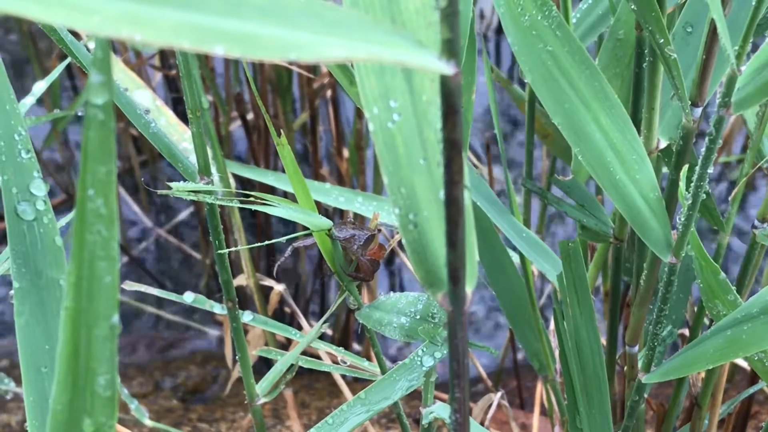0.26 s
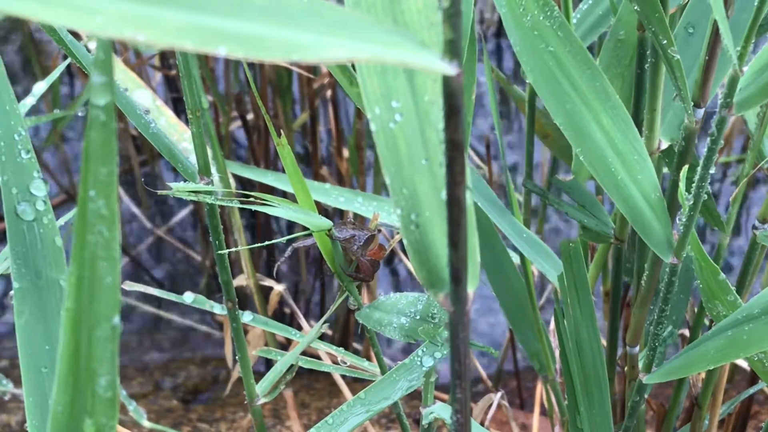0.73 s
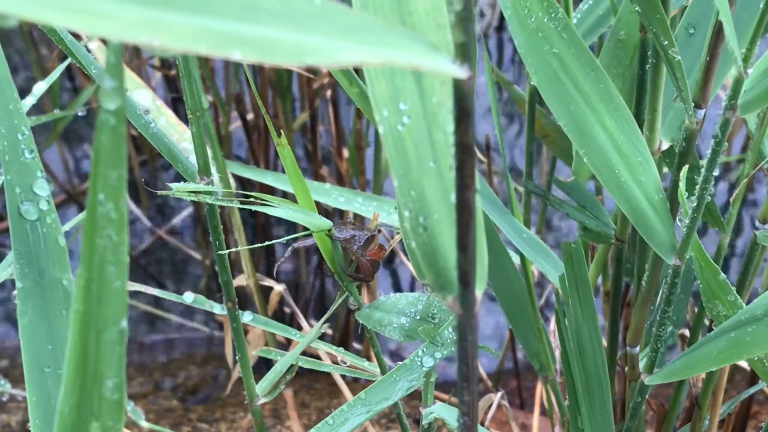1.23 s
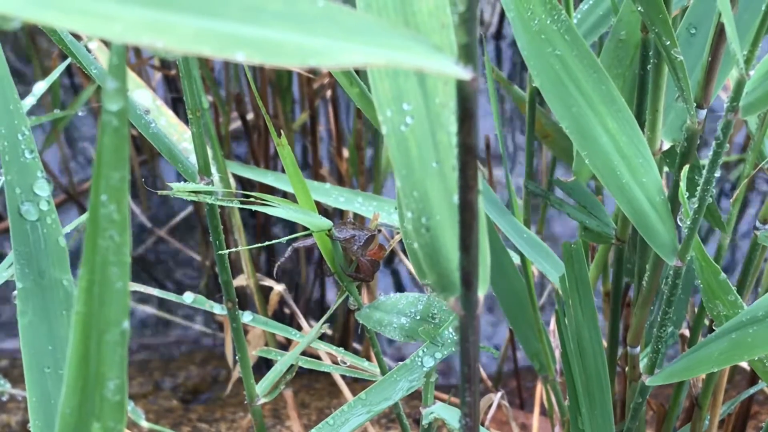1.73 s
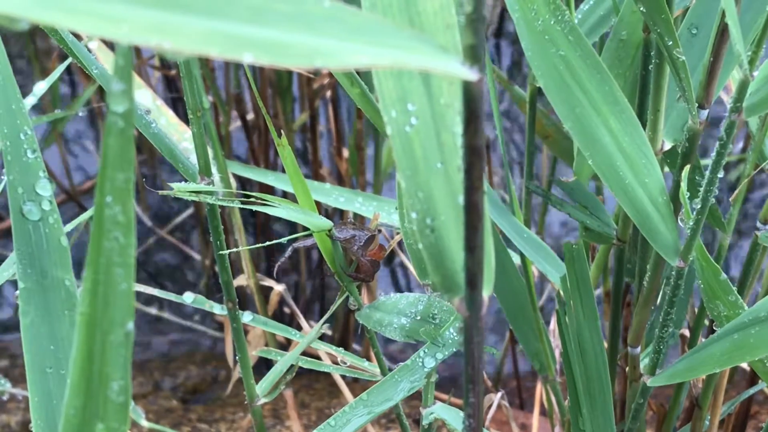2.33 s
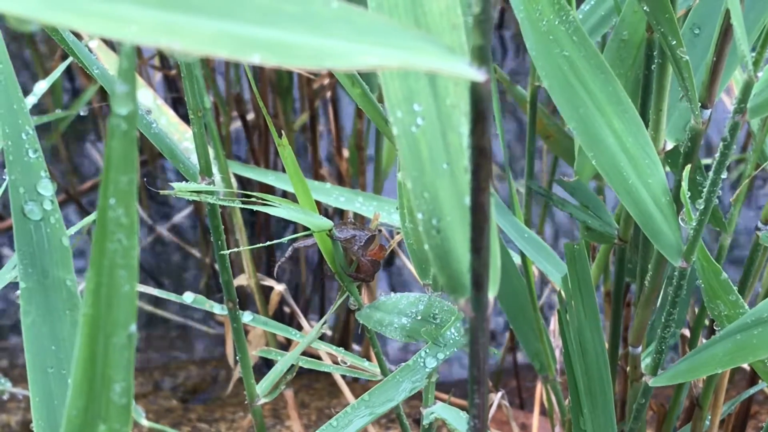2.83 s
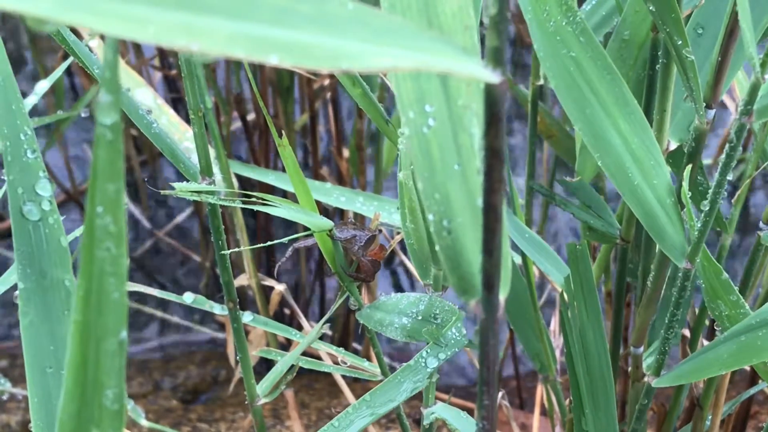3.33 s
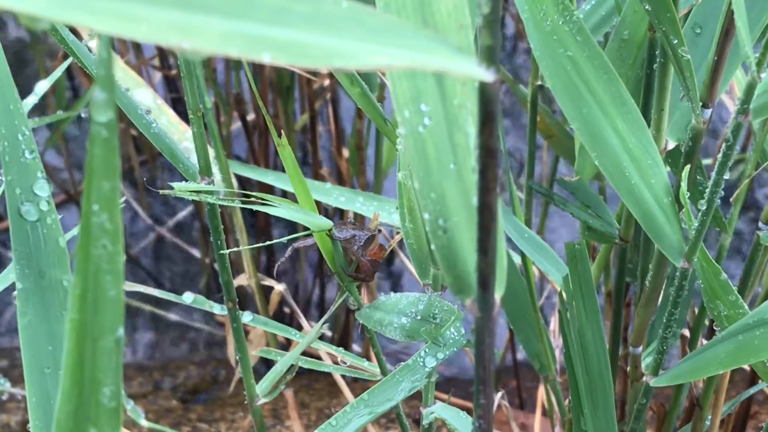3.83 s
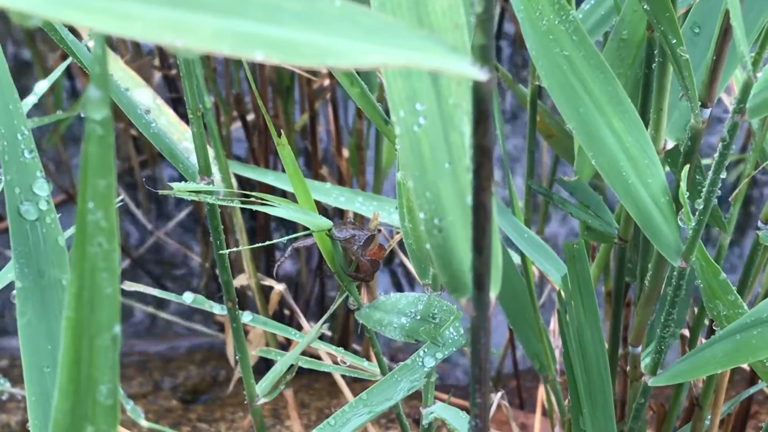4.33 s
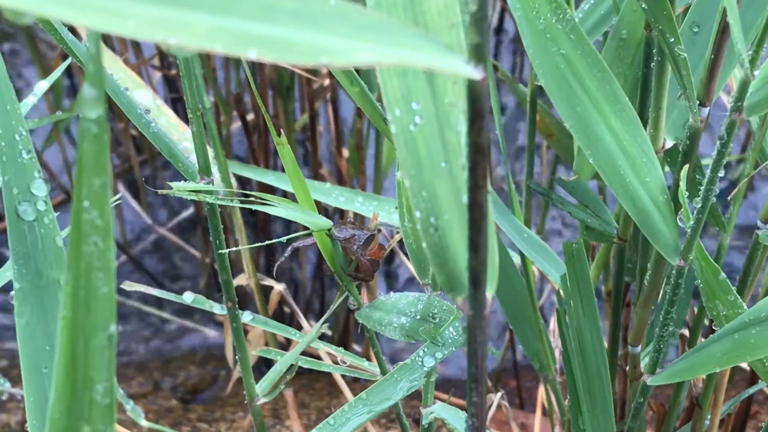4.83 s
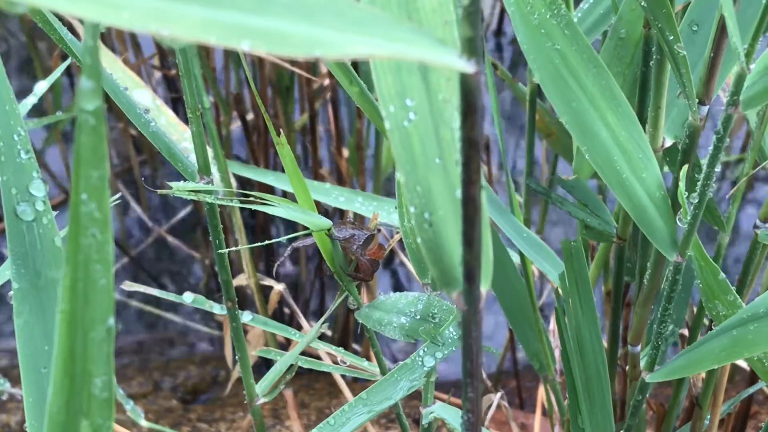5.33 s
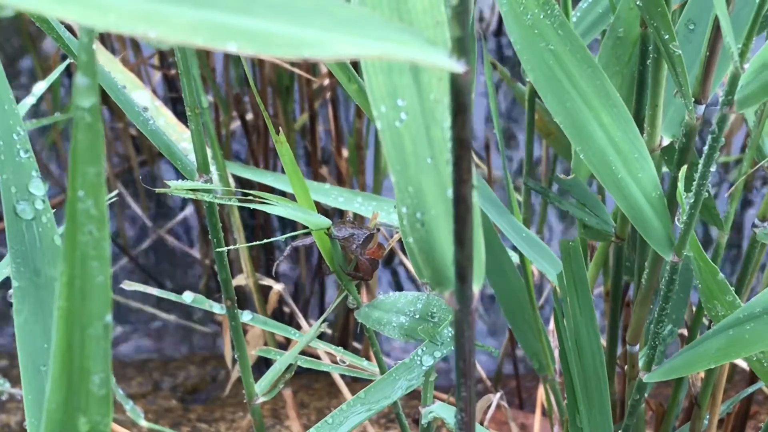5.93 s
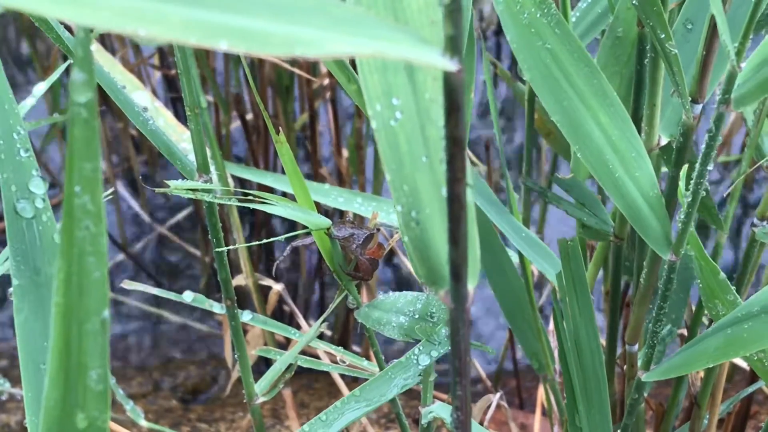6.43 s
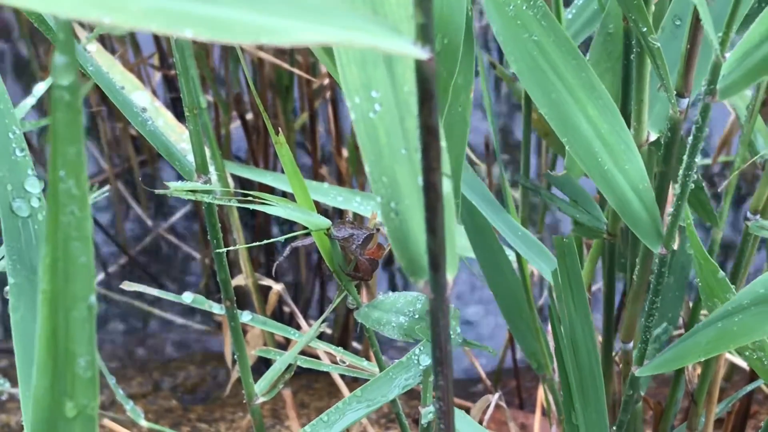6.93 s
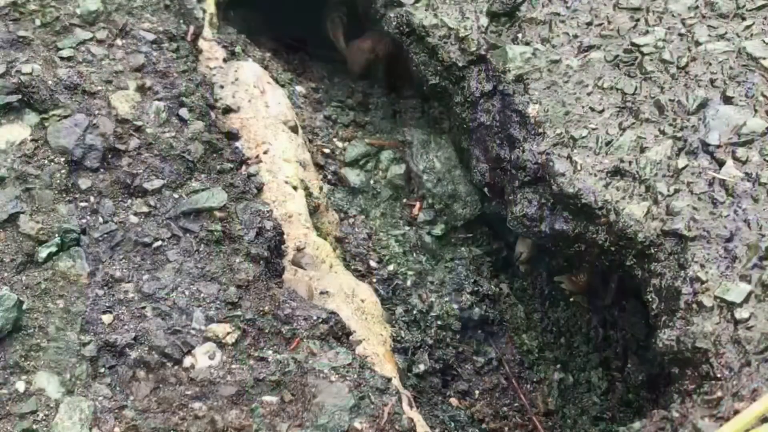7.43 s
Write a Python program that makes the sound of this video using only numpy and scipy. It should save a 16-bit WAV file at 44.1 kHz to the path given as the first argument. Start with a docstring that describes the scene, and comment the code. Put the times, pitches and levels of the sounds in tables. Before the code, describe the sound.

After rain, small drops plink and tick among lakeside reeds, with soft hiss, low rumble, faint chirps and a late dull swell.

```python
"""Reeds by a lake after rain: drops fall from the wet leaves, plink in the water and tap on blades and stems.
Each plink is a fading tone from an air bubble; each tap is a short leaf ring with a burst of noise.
Shaped noise makes a low distant rumble, faint outdoor air and a soft hiss, like a breeze in the reeds.
Faint chirps, perhaps of a far bird, are short bending tones; near the end a dull wash of noise comes up.
One microphone feeds both channels."""
import sys
import numpy as np
from scipy import signal
from scipy.fft import rfft, irfft, next_fast_len
from scipy.io import wavfile
from scipy.ndimage import uniform_filter1d, map_coordinates

SR = 44100
rng = np.random.default_rng(int(sys.argv[2]) if len(sys.argv) > 2 else 0)


def generate_wav(sig):
    """Save sig (samples, or channels by samples) to the path in sys.argv[1] as 16-bit PCM at SR."""
    pcm = np.round(np.clip(np.atleast_2d(sig).T, -1, 1) * 32767).astype(np.int16)
    wavfile.write(sys.argv[1], SR, pcm)


N = 338372
TIME = np.arange(N) / SR
RING = np.arange(SR // 8) / SR  # the time axis in s of one short ringing sound


def amp(db):
    """Turn decibels into a gain."""
    return 10 ** (np.asarray(db) / 20)


def unit(x):
    """Scale to an average (rms) strength of 1."""
    return x / np.sqrt(np.mean(x ** 2) + 1e-20)


def level(rows):
    """Join (time_s, level_db) points into a gain for each sample."""
    times_s, levels_db = np.transpose(rows)
    return amp(np.interp(TIME, times_s, levels_db))


def fade(t60):
    """A smooth decay that loses 60 dB in t60 seconds."""
    return np.exp(-np.log(1000) * RING / t60)


def add(track, start_s, sound):
    """Mix a sound into the track at start_s, cut off at the track's end."""
    start = int(np.clip(round(start_s * SR), 0, N))
    track[start:start + len(sound)] += sound[:N - start]


def filtered(x, response):
    """Give each frequency in x its own gain."""
    size = next_fast_len(N + SR // 4)
    gain = response(np.fft.rfftfreq(size, 1 / SR))
    return irfft(rfft(x, size) * gain, size)[:N]


def wobble(size, rate):
    """A smooth random curve of size samples, through rate random points a second."""
    positions = np.arange(size) * rate / SR
    return map_coordinates(rng.standard_normal(128), [positions], mode="mirror")


def noise(spectrum, patchy_db):
    """Noise of rms 1 with a chosen colour and patches of random gain across time and pitch."""
    grid = signal.stft(rng.standard_normal(N), nperseg=512)[2]
    patches = uniform_filter1d(rng.standard_normal(grid.shape), size=7, axis=0)  # smooth across pitch
    patches = uniform_filter1d(patches, size=10, axis=1)  # smooth across time
    patchy = signal.istft(grid * amp(patchy_db * unit(patches)), nperseg=512)[1][:N]
    hz, db = np.transpose(spectrum)
    return unit(filtered(patchy, lambda f: amp(np.interp(np.log(f + 1), np.log(hz), db))))


def bubble(hz, t60, attack, rise):
    """A ring of peak 1 that dies away; its pitch glides from hz and levels off as if near the surface."""
    envelope = fade(t60) * (1 - np.exp(-RING / max(attack, 1e-5)))
    glide_s = 0.018
    pitch = np.minimum(hz * (1 + rise * glide_s * np.tanh(RING / glide_s)), SR / 2)
    return envelope / envelope.max() * np.sin(2 * np.pi * np.cumsum(pitch) / SR)


# colour of the rumble: freq_hz, strength_db (relative, per Hz)
RUMBLE_COLOUR = [(20, -42), (31, -24), (40, -6.5), (50, -1.5), (62, -0.5), (78, 0.5), (98, -4), (130, -3.5),
                 (165, -5), (210, -8), (250, -9), (310, -15.5), (400, -24), (520, -44), (800, -75)]
# the rumble holds steady, then dips briefly near the end: time_s, level_db
RUMBLE_LOUDNESS = [(6.5, -49.7), (6.7, -48.5), (6.9, -50), (7.2, -53.5), (7.55, -49.5), (7.67, -48)]


def distant_rumble():
    """Low noise, strongest in the bass, that follows its loudness curve."""
    return level(RUMBLE_LOUDNESS) * noise(RUMBLE_COLOUR, patchy_db=-0.23)


# colour of the outdoor air: freq_hz, strength_db (relative, per Hz)
AIR_COLOUR = [(250, -27), (400, -4), (650, -4), (920, -4.5), (1400, -6), (1750, -10.5), (2700, -13),
              (3900, -13), (7400, -20.5), (11000, -23.5), (15700, -20)]
# the air drops with the rumble near the end: time_s, level_db
AIR_LOUDNESS = [(7.0, -63.5), (7.15, -67), (7.67, -64.5)]


def outdoor_air():
    """Faint, slightly patchy noise of the open air."""
    return level(AIR_LOUDNESS) * noise(AIR_COLOUR, patchy_db=1.3)


# colour of the hiss in the reeds: freq_hz, strength_db (relative, per Hz)
REED_COLOUR = [(900, -11), (1600, -5), (2400, -0.5), (3900, -0.5), (6000, -2.5), (9000, -5.5), (11500, -9),
               (13000, -8.5), (15700, -13.5)]
# level of the treble, which the breeze lifts above that of still air: time_s, level_db
TREBLE_LOUDNESS = [(0.0, -70.5), (0.64, -73.5), (0.92, -72), (1.05, -71.5), (1.96, -71.5), (2.78, -67),
                   (2.97, -65), (3.27, -66), (3.54, -68), (3.84, -68.5), (4.51, -66), (4.8, -63.5),
                   (6.37, -66), (6.75, -63.5), (6.96, -64.5), (7.12, -65.5), (7.18, -68), (7.33, -68.5),
                   (7.42, -70.5), (7.67, -74)]
STILL_TREBLE_DB = -72  # the treble with no breeze
REEDS_DB = 3  # the hiss over the treble that the breeze adds


def reeds_in_breeze():
    """A patchy hiss that swells with the treble power above that of still air."""
    added_power = level(TREBLE_LOUDNESS) ** 2 - amp(STILL_TREBLE_DB) ** 2
    breeze = np.sqrt(np.maximum(added_power, 0))
    return amp(REEDS_DB) * breeze * noise(REED_COLOUR, patchy_db=1.93)


def far_drips(centre_hz, cycles, count):
    """Very faint drops at random times all over the reed bed; higher plinks tend to be quieter."""
    track = np.zeros(N)
    for when, height, loud, climb in rng.uniform(size=(count, 4)):
        hz = centre_hz * 2 ** (3.2 * (height - .5))  # spread over 3.2 octaves
        db = -70.5 + 9 * loud - 6 * (height - .5)
        add(track, when * N / SR, amp(db) * bubble(hz, cycles / hz, attack=0.0005, rise=15 * climb))
    return track


def mist_ticks(peak_db, cycles, count):
    """The finest droplets tick faintly on the blades, at random times and pitches."""
    track = np.zeros(N)
    for when, height, loud in rng.uniform(size=(count, 3)):
        hz = 4000 + 10000 * height
        tick = bubble(hz, cycles / hz, attack=.0001, rise=0)
        add(track, when * N / SR, amp(peak_db - 10 * loud) * tick)
    return track


def plink(hz, t60, attack, rise, churn, life_share):
    """Churning water makes a bubble's ring uneven; it stops early when the bubble bursts."""
    uneven = 1 + churn * wobble(len(RING), rate=430)
    alive = 1 / (1 + (RING / (life_share * t60 + attack)) ** 8)
    return bubble(hz, t60, attack, rise) * uneven * alive


# air bubbles trapped by drops in the water:
# start_s, pitch_hz (at first), level_db (peak before the churn), fade_s (to lose 60 dB, before the burst),
# rise_per_s (pitch glide at first, as a share of the pitch; below zero it falls)
WATER_BUBBLES = [(0.108, 1420, -54, 0.058, 6), (.17, 1970, -57.5, .03, 12), (0.205, 1270, -50, 0.013, 17),
                 (.233, 1040, -48, 0.011, 0), (.261, 1570, -56.5, 0.063, 40),
                 (.307, 1630, -53.5, 0.045, 38), (.318, 1420, -62, .05, 9), (.513, 4070, -58, 0.016, -4),
                 (.562, 4550, -53.5, 0.017, -2), (0.908, 1000, -50.5, 0.057, -3),
                 (1.081, 860, -56, .025, 28.5), (1.092, 1150, -52, 0.014, 9),
                 (1.4384, 2420, -52, 0.023, -9), (1.553, 3550, -56.5, .028, 2), (1.596, 4280, -65, .06, -1),
                 (1.607, 3600, -59, .03, 2), (1.846, 2170, -59, .02, 0), (1.8655, 1410, -46, 0.044, -11),
                 (1.905, 2364, -54, 0.026, 4), (1.937, 1600, -57, .028, 11), (1.963, 1530, -55, 0.046, 4),
                 (2.0062, 3280, -38.5, 0.017, -2), (2.032, 2280, -57, 0.03, 5),
                 (2.047, 3110, -52.5, 0.056, 31.5), (2.292, 820, -55.5, 0.049, 57),
                 (2.6448, 695, -44, 0.027, 46), (2.6501, 1000, -46.5, 0.028, 4.5),
                 (2.668, 2300, -59, .02, 0), (2.713, 430, -53, .055, 70), (2.901, 1450, -50, 0.049, 8.5),
                 (3.342, 860, -48.5, 0.02, -8), (3.3565, 720, -51, .02, -7), (3.375, 630, -54, 0.039, 8),
                 (3.473, 927, -47, 0.027, 3), (3.484, 970, -53.5, .022, 0), (3.503, 2100, -48, 0.036, 6),
                 (4.113, 809, -52, .028, 34), (4.146, 760, -42.5, 0.034, 19), (4.169, 724, -51, 0.045, -2),
                 (4.236, 2600, -56, 0.039, -3), (4.243, 4050, -59.5, .04, -1), (4.256, 2350, -58, .03, 0),
                 (4.639, 1560, -43.5, 0.01, 4), (4.918, 1020, -50, 0.025, -9), (4.957, 2900, -51, .025, -2),
                 (4.962, 2490, -53, 0.033, 1.5), (5.149, 3420, -56, 0.028, 7),
                 (5.316, 2200, -56, 0.05, -19), (5.8407, 1050, -38, 0.036, 24.5),
                 (5.8822, 1450, -41, 0.0042, 0), (6.086, 853, -54.5, 0.11, 7.5),
                 (6.262, 4150, -61, .05, -2), (6.436, 2090, -60, .05, 3), (7.008, 2930, -54.5, .03, -3),
                 (7.495, 6040, -64, .06, 1)]
# a long ring also builds slowly, unless the bubble is already racing to the surface (its pitch glides fast)
BUILD_S, LONG_RING_S, RACING_RISE_PER_S = 0.0017, 0.073, 19


def water_plinks():
    """Drops trap bubbles of air, and each bubble rings as a short gliding tone."""
    track = np.zeros(N)
    for start_s, hz, db, t60, rise in WATER_BUBBLES:
        build = BUILD_S * (t60 / LONG_RING_S) ** 2 / (1 + (rise / RACING_RISE_PER_S) ** 2)
        add(track, start_s, amp(db) * plink(hz, t60, build, rise, churn=0.21, life_share=0.75))
    return track


def tap(hz, spray_db, cycles, spray_t60, spray_top_hz):
    """A wet leaf rings for a few cycles while the drop bursts into noisy spray."""
    leaf = bubble(hz, cycles / hz, attack=0.00017, rise=0)
    band = signal.butter(1, [1500, spray_top_hz], "bandpass", fs=SR)
    spray = signal.lfilter(*band, rng.standard_normal(len(RING))) * fade(spray_t60)
    return leaf + amp(spray_db) * spray / np.abs(spray).max()


# drops that tap on leaves:
# start_s, level_db (peak of the leaf's ring), pitch_hz (leaf resonance), spray_db (peak relative to the ring)
LEAF_TAPS = [(0.109, -53, 6300, 1), (.15, -53, 5100, -4.5), (.363, -53, 7700, -17), (.562, -59, 4600, -10),
             (.907, -57, 2700, 3), (.936, -54, 3000, -12), (1.143, -54, 5500, -10), (1.254, -52.5, 5600, 2),
             (1.72, -49, 2980, -4), (1.72, -47, 1800, -14), (1.866, -50, 5150, -12),
             (1.89, -50.5, 3200, -4), (2.006, -52, 4100, -14), (2.011, -50, 5070, -18),
             (2.017, -53, 6500, -12), (2.043, -43.5, 1770, -15), (2.044, -47, 5960, -2),
             (2.086, -49.5, 5400, -19), (2.852, -50.5, 1400, 3.5), (2.901, -49, 2700, -6),
             (3.341, -49, 2920, -4), (3.419, -43.5, 3140, -9), (3.472, -53, 2290, -9),
             (4.106, -54, 3000, -5), (4.147, -49, 1650, -8), (4.184, -53, 3400, -1),
             (4.573, -47, 2500, -7.5), (4.6392, -43, 3300, -6), (4.6392, -46, 4500, -10),
             (4.903, -48, 1800, 0), (4.919, -52, 1700, -6), (4.961, -45, 2950, -8),
             (5.5146, -46.5, 9400, -8), (5.882, -50, 2350, -10.5)]


def leaf_taps():
    """Drops strike blades and stems, each with a short ring and a burst of spray."""
    track = np.zeros(N)
    for start_s, db, hz, spray_db in LEAF_TAPS:
        add(track, start_s, amp(db) * tap(hz, spray_db, cycles=11.0, spray_t60=0.041, spray_top_hz=9300))
    return track


# tiny droplets that ping: start_s, pitch_hz, level_db (peak of the ping alone)
TINY_DROPLETS = [(.199, 6750, -57), (.266, 9050, -58), (.279, 6000, -58), (.686, 10950, -60),
                 (1.6752, 15400, -51), (2.204, 11690, -59.5), (2.9351, 9600, -45.3), (3.375, 12550, -58),
                 (3.553, 13600, -56), (4.0865, 12950, -52), (6.16, 9830, -54)]


def droplet_pings():
    """A sharp ping, then the film of water shivers on as noise around the same pitch."""
    track = np.zeros(N)
    for start_s, hz, db in TINY_DROPLETS:
        ping = bubble(hz, t60=0.0056, attack=.0002, rise=0)
        resonance = bubble(hz, t60=0.0027, attack=0.00015, rise=0)
        shiver = unit(signal.fftconvolve(rng.standard_normal(len(RING)), resonance)[:len(RING)])
        add(track, start_s, amp(db) * (ping + amp(-10.5) * shiver * fade(0.058)))
    return track


# soft bending chirps:
# start_s, length_s, first_hz, middle_hz, last_hz (pitch before the quiver), level_db (peak before the flutter)
SOFT_CHIRPS = [(.285, .03, 3250, 3360, 3130, -67), (.315, 0.03, 3400, 3720, 3680, -68),
               (.98, .028, 4180, 4250, 4200, -70), (1.132, .028, 3500, 3600, 3680, -67),
               (1.623, .025, 4350, 4520, 4700, -66.5), (2.065, 0.031, 2370, 2590, 2680, -66),
               (4.11, .02, 2850, 3200, 3330, -65), (4.21, 0.05, 3280, 3040, 2970, -66),
               (4.272, 0.024, 3700, 3890, 3880, -59), (4.395, .025, 2600, 2630, 2780, -63.5),
               (4.528, .045, 3150, 3320, 3350, -65), (5.095, .04, 3350, 3100, 3400, -66),
               (5.146, 0.018, 2080, 1795, 1850, -57), (5.16, 0.044, 1760, 2210, 2280, -55.5),
               (5.825, 0.033, 3720, 3790, 3860, -59.5), (5.979, 0.027, 3400, 3660, 3620, -54),
               (6.286, 0.037, 3600, 3820, 3880, -59), (6.752, 0.024, 3050, 3170, 3080, -61),
               (6.774, 0.034, 4060, 3920, 3830, -61.5), (6.808, 0.035, 3480, 3760, 4200, -56),
               (6.824, 0.026, 3680, 3820, 3700, -59), (6.88, .03, 4000, 4250, 3950, -65.5),
               (6.94, .035, 3200, 3050, 3150, -67), (6.995, 0.027, 2470, 2490, 2650, -65),
               (7.021, 0.025, 3200, 3070, 2950, -59.5), (7.265, .028, 3150, 3550, 3850, -67)]
# roughness: share of the level, share of the pitch, random points per s
CHIRP_FLUTTER, CHIRP_QUIVER, CHIRP_ROUGH_PER_S = .33, .014, 450


def chirps():
    """Each soft chirp swells, bends through three pitches and fades; its level and pitch quiver."""
    track = np.zeros(N)
    for start_s, length_s, first, middle, last, db in SOFT_CHIRPS:
        u = np.linspace(0, 1, max(int(length_s * SR), 8))  # from start to end of the chirp
        bend = np.polyfit([0, .5, 1], [first, middle, last], 2)
        pitch = np.polyval(bend, u) * (1 + CHIRP_QUIVER * wobble(len(u), CHIRP_ROUGH_PER_S))
        uneven = 1 + CHIRP_FLUTTER * wobble(len(u), CHIRP_ROUGH_PER_S)
        swell = np.sqrt(np.abs(np.sin(np.pi * u)))
        tone = np.sin(2 * np.pi * np.cumsum(pitch) / SR)
        add(track, start_s, amp(db) * swell * uneven * tone)
    return track


# drops that break into spatter: start_s, length_s, centre_hz, level_db (peak of the loudest possible bubble)
SPATTERING_DROPS = [(1.857, 0.028, 2630, -62), (2.005, .016, 5000, -55), (3.375, 0.013, 2700, -49.5),
                    (3.377, .022, 3670, -56), (3.425, 0.014, 3100, -55), (4.146, .005, 2200, -56),
                    (4.96, .01, 2720, -54), (4.968, 0.028, 1210, -60.5), (5.284, .03, 2790, -59.5),
                    (4.19, .05, 4000, -63), (7.285, .06, 3700, -62)]
SPATTER_PER_S, SPATTER_OCTAVES, SPATTER_RANGE_DB = 600, 0.42, 8


def splashes(cycles):
    """A drop breaks up into a quick spatter of tiny short-lived bubbles."""
    track = np.zeros(N)
    for start_s, length_s, centre_hz, db in SPATTERING_DROPS:
        count = max(int(length_s * SPATTER_PER_S), 1)
        for k, (late, height, loud) in enumerate(rng.uniform(size=(count, 3))):
            hz = centre_hz * 2 ** (SPATTER_OCTAVES * (height - .5))
            gain = amp(db - SPATTER_RANGE_DB * loud)
            when_s = start_s + length_s * (k + late) / count
            add(track, when_s, gain * bubble(hz, cycles / hz, attack=0.00032, rise=0))
    return track


# colour of the dull wash: freq_hz, strength_db (relative, per Hz)
WASH_COLOUR = [(250, 4.5), (450, 4.5), (620, 6.5), (900, -5), (1300, -7), (3000, -24.5)]
# the wash comes up near the end: time_s, level_db
WASH_LOUDNESS = [(7.1, -95), (7.28, -70), (7.4, -68), (7.46, -60), (7.53, -65), (7.67, -70)]


def late_wash():
    """Dull noise with little treble that swells near the end."""
    return level(WASH_LOUDNESS) * noise(WASH_COLOUR, patchy_db=0.0)


def scatter(x, t60, delay):
    """Stems and the bank throw back a short diffuse echo: a noise tail that builds, then fades."""
    tail = rng.standard_normal(len(RING)) * fade(t60) * (1 - np.exp(-(RING / delay) ** 2))
    return signal.fftconvolve(x, tail / np.linalg.norm(tail))[:N]


def scene():
    """Drips, chirps and their echo over the background, alike in both channels."""
    background = distant_rumble() + outdoor_air() + reeds_in_breeze() + late_wash()
    faint_drips = far_drips(centre_hz=2954, cycles=41, count=200) + mist_ticks(peak_db=-57.5, cycles=55, count=100)
    near_drips = water_plinks() + leaf_taps() + droplet_pings() + splashes(cycles=22)
    events = faint_drips + near_drips + chirps()
    echo = amp(-13.5) * scatter(events, t60=0.065, delay=0.0036)
    mono = events + echo + background
    return np.array([mono, mono])


# colour of the microphone: centre_hz, width_hz, gain_db (at the centre of the dip)
MICROPHONE_DIPS = [(1760, 140, -2), (3470, 320, -1.5), (4960, 620, -3), (7680, 800, -2.5),
                   (10420, 1050, -3.5)]
TOP_HZ = 15750  # band limit


def record(dry):
    """The microphone port carves shallow dips; nothing passes above the band limit."""
    def microphone(f):
        """Gain at each frequency f in Hz."""
        dips_db = sum(db * np.exp(-(2 * (f - hz) / width) ** 2) for hz, width, db in MICROPHONE_DIPS)
        return amp(dips_db) * (f < TOP_HZ)
    return np.array([filtered(channel, microphone) for channel in dry])


dry = scene()
out = record(dry)
generate_wav(out)
```